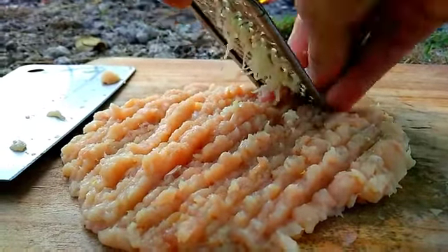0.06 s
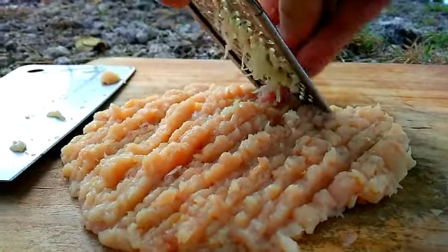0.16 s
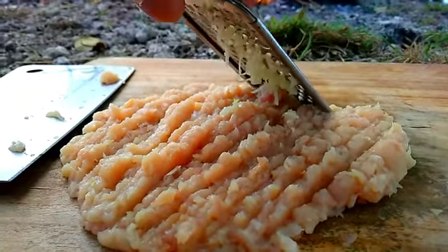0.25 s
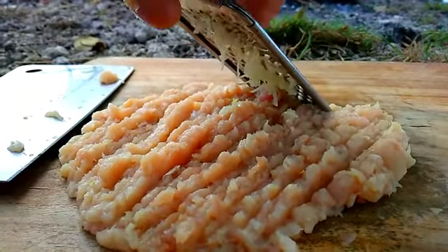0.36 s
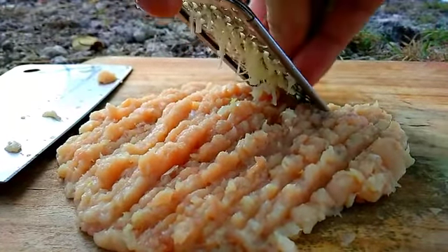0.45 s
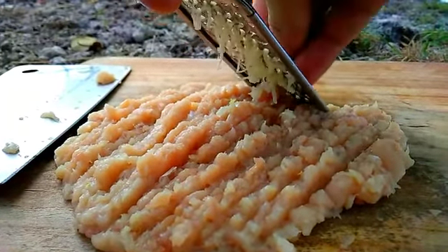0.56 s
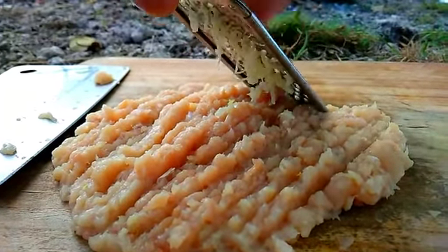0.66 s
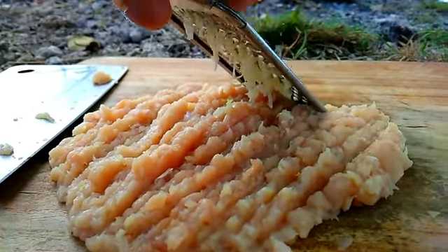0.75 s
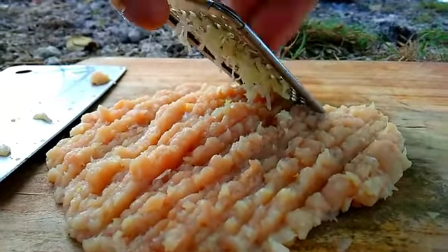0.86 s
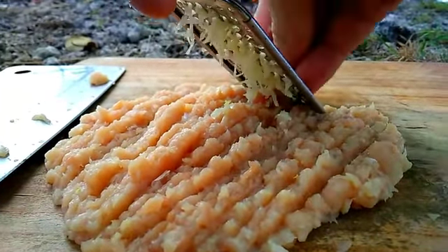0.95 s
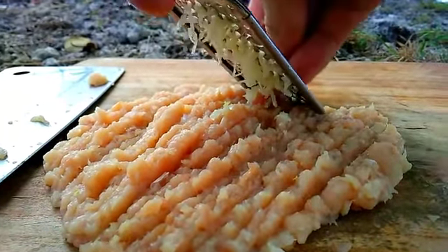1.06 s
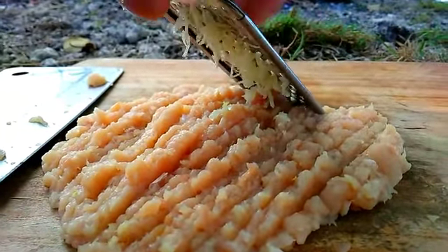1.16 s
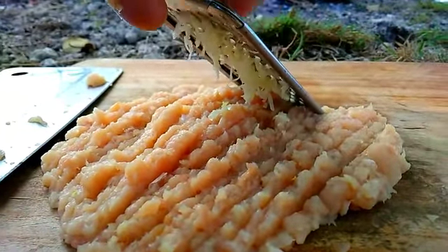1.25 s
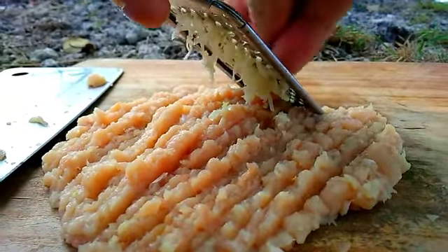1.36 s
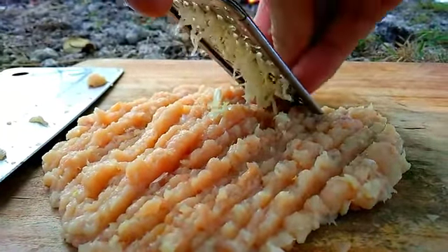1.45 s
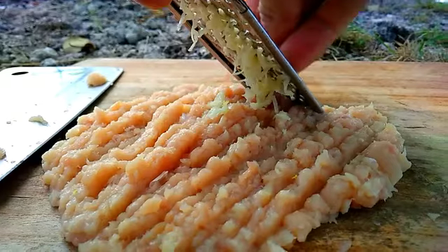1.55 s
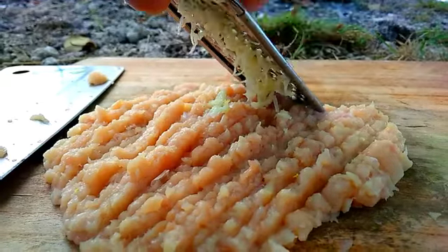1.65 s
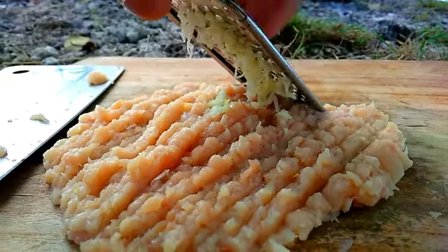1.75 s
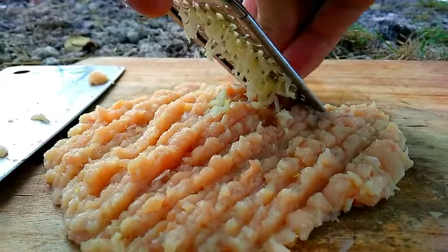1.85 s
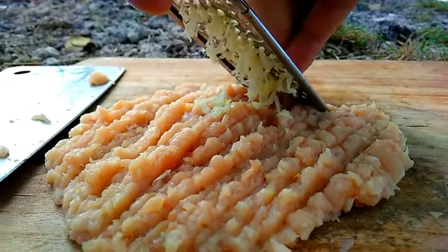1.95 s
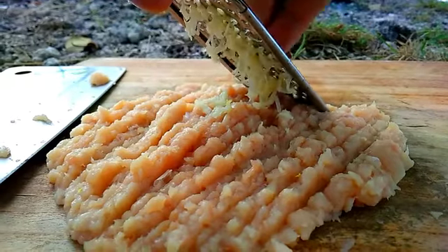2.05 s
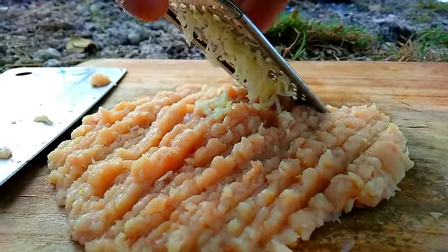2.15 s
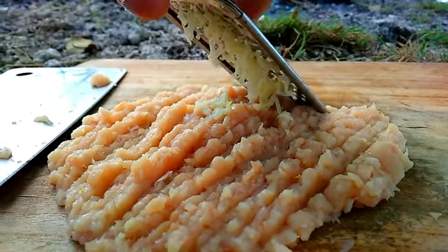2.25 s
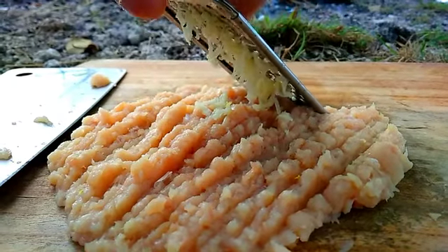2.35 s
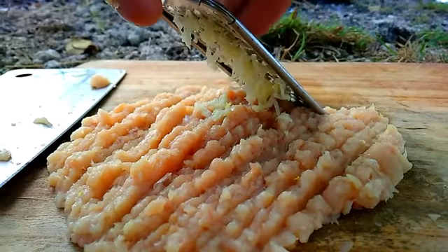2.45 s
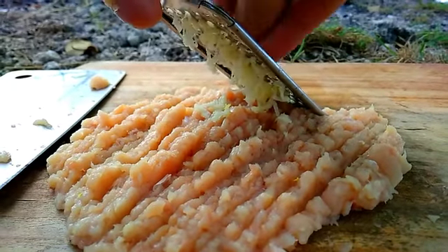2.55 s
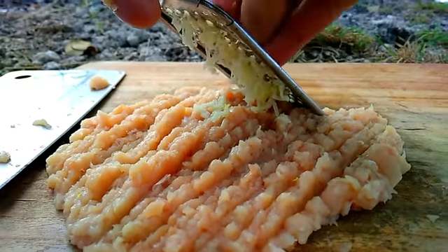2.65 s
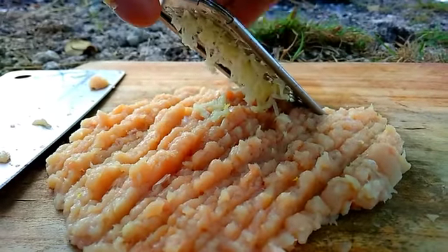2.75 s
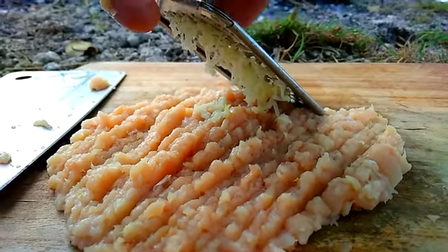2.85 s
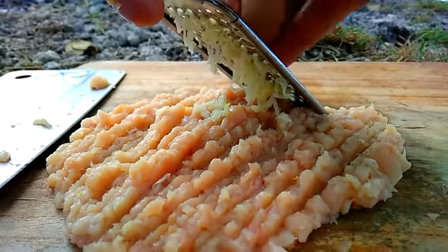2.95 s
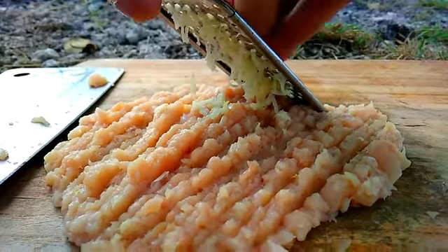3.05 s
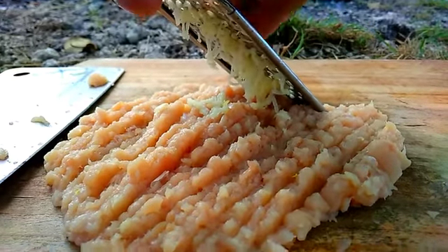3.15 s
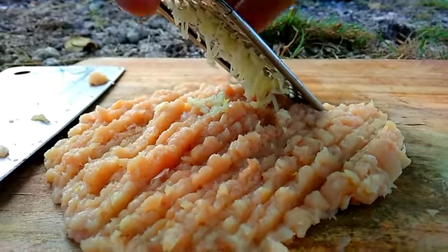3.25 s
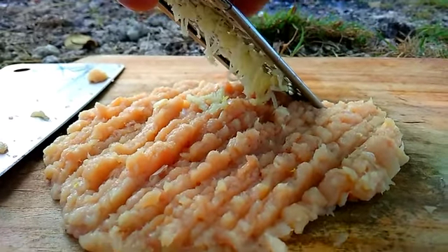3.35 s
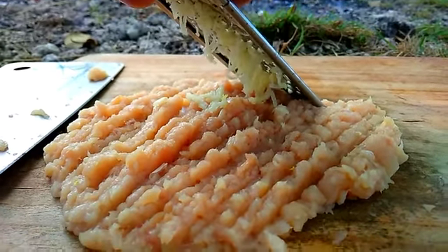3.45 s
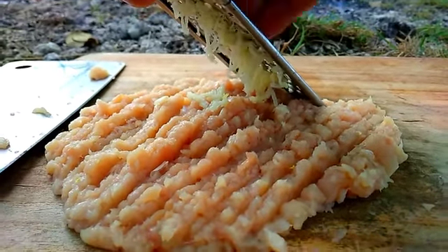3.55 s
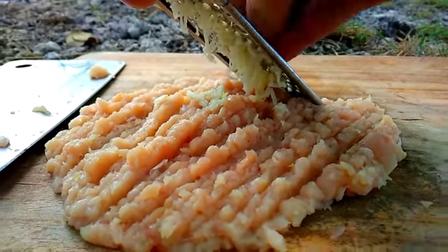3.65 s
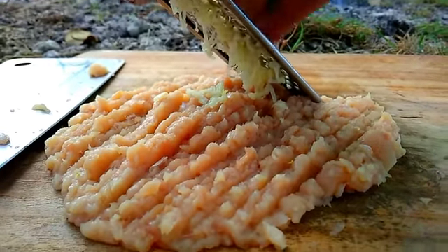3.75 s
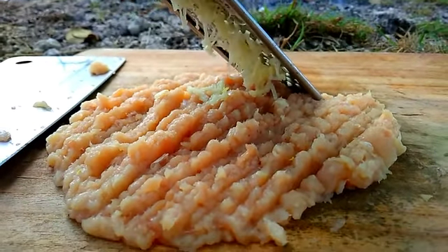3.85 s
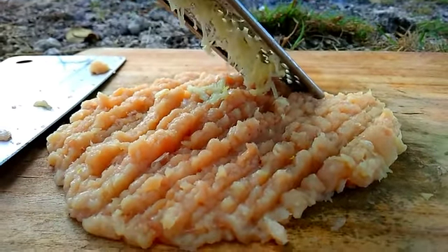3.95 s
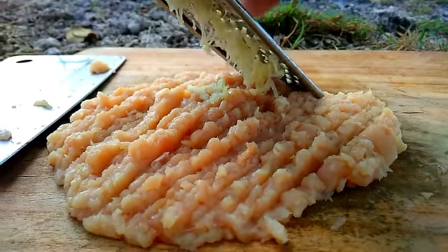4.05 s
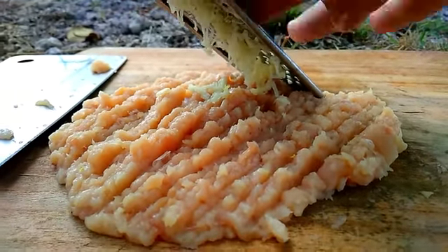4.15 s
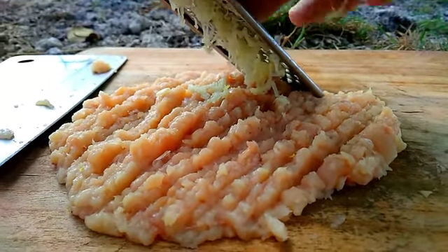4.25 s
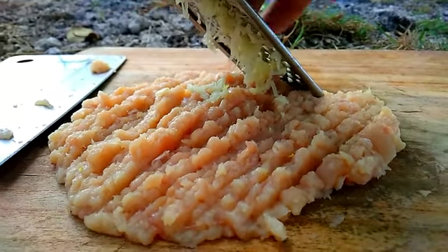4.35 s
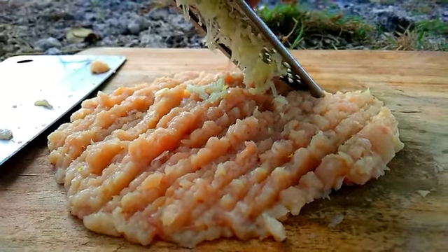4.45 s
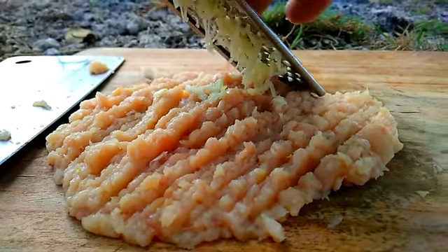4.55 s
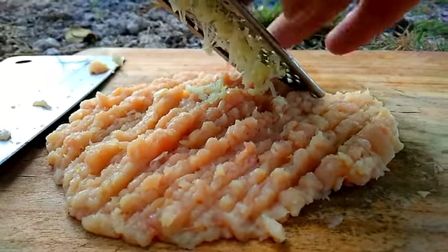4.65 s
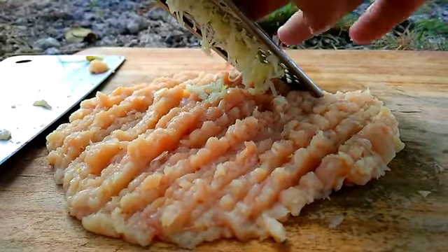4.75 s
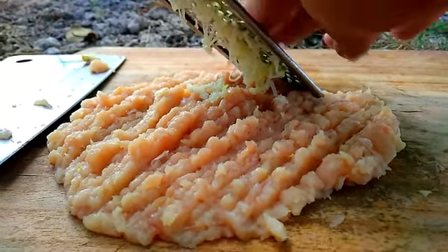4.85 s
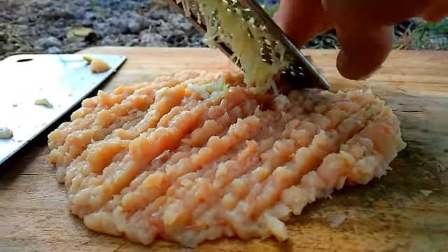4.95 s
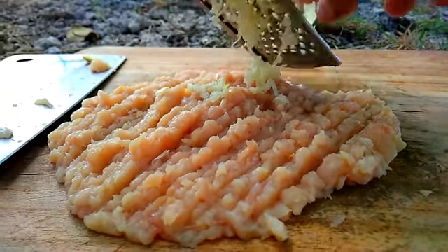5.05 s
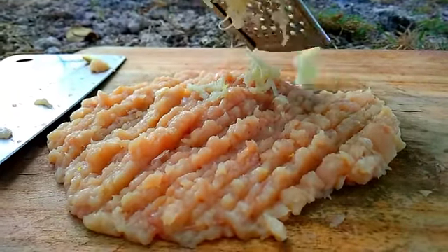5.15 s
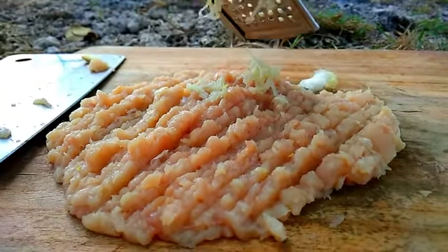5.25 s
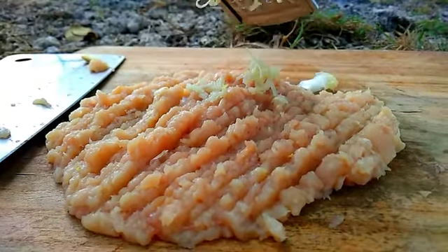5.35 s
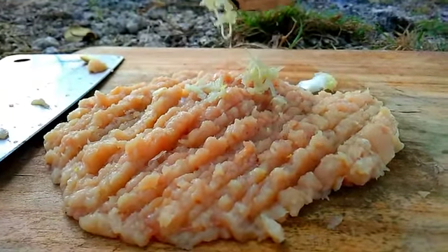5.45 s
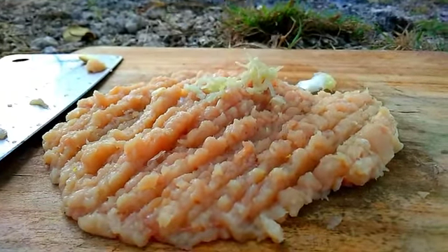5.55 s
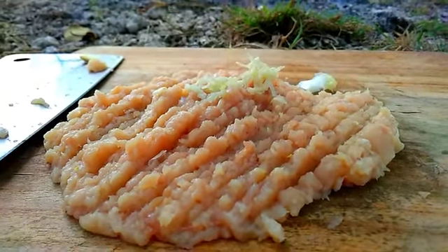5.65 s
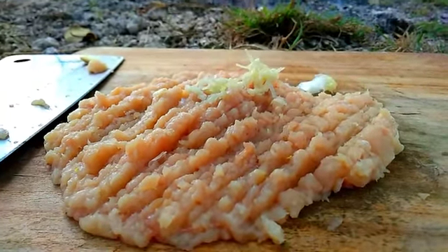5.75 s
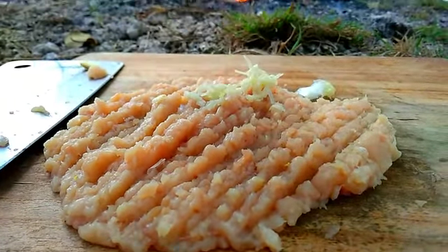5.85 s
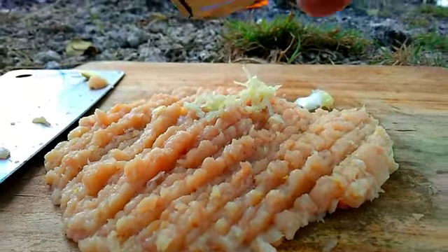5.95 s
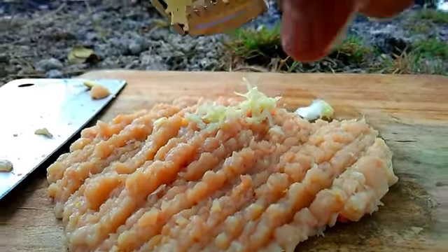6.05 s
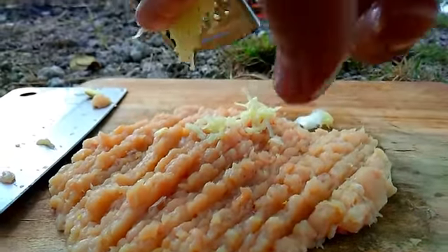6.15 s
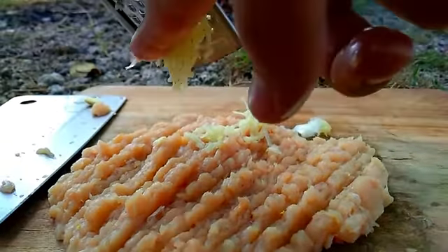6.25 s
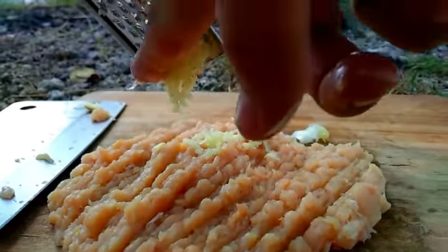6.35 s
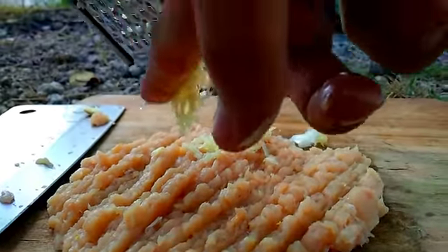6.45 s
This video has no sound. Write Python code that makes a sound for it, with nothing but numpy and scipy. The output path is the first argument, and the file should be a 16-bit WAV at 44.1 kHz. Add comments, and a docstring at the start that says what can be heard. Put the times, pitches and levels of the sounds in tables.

```python
"""Grating ginger outdoors

A ginger root is rubbed over a small steel grater standing on a chopping board, heard close up.
Each cut tears fibres (a bright crackle) and plucks the teeth (a hollow rasp in the plate); the way
back is a light scrape. Wet pulp ticks, and tough fibres catch with a knock and a crack.
Puffs of wind buffet the two microphone ports, over a bed of soft air and a faint low hum."""
import sys
import numpy as np
from scipy import signal
from scipy.fft import rfft, irfft, next_fast_len
from scipy.io import wavfile
from scipy.ndimage import uniform_filter1d, map_coordinates

SR = 44100
rng = np.random.default_rng(int(sys.argv[2]) if len(sys.argv) > 2 else 0)


def int16_out(signal):
    """Quantize to a 16-bit WAV file."""
    q = np.round(np.clip(np.atleast_2d(signal).T, -1, 1) * 32767)
    wavfile.write(sys.argv[1], SR, q.astype(np.int16))


N = 287519
TIME = np.arange(N) / SR

# Levels in the tables are relative; each layer has its own fader.
# cuts down the grater: start_s, length_s, fastest_at_fraction, teeth_db, fibre_db
CUT_STROKES = [(-0.081, 0.19, 0.72, -24, -26), (0.414, 0.175, 0.46, -27.0, -28),
               (0.853, 0.215, 0.64, -28, -29), (1.344, 0.192, 0.46, -27.5, -28.0),
               (1.816, 0.17, 0.45, -28.5, -29), (2.53, 0.183, 0.8, -38, -41.5),
               (2.937, 0.14, 0.25, -34.5, -37), (3.576, 0.152, 0.65, -39, -43),
               (4.202, 0.07, 0.15, -39, -43.5), (4.856, 0.17, 0.38, -37.5, -46)]
# light strokes, back up or to reseat the root: start_s, length_s, fastest_at_fraction, teeth_db, rub_db
BACK_STROKES = [(0.195, 0.16, 0.63, -48.5, -36.5), (0.646, 0.144, 0.44, -48.5, -40.0),
                (1.137, 0.15, 0.79, -51.5, -41), (1.629, 0.12, 0.19, -49.5, -41),
                (1.988, 0.13, 1, -72.5, -55.5), (2.07, 0.21, 0.47, -57.5, -62.5),
                (2.487, 0.051, 0.65, -71.5, -62), (2.779, 0.12, 0.32, -52.5, -48),
                (3.124, 0.091, 0.79, -57, -54.5), (3.2, 0.097, 0.72, -62.5, -73.5),
                (3.488, 0.028, 0.2, -70, -64.5), (3.733, 0.086, 1, -64.5, -61.5),
                (3.826, 0.14, 0.5, -51.5, -58.5), (4.041, 0.1, 0.25, -62, -57),
                (4.162, 0.024, 0.24, -46.5, -47), (4.599, 0.011, 0.47, -74, -54),
                (4.691, 0.15, 0.15, -53, -55)]
# wet pulp snapping, and from 5.8 s, after the grating stops, faint rustles of handling: start_s, level_db,
# pitch_hz, t60_s
PULP_TICKS = [(0.359, -26, 10000, 0.02), (0.702, -24.5, 10600, .012), (1.3339, -28.5, 9400, 0.026),
              (1.647, -26, 9800, 0.017), (1.941, -28, 10200, 0.011), (2.031, -18, 10300, 0.0076),
              (2.3745, -58, 11750, .04), (2.525, -43, 2320, 0.018), (2.544, -25, 11200, .015),
              (2.825, -28.5, 11000, 0.0091), (2.9278, -29, 12000, 0.022), (3.218, -35, 12200, .012),
              (3.5733, -33, 11100, 0.012), (3.7973, -36.5, 11700, 0.017), (4.045, -39.5, 2950, 0.013),
              (4.127, -35, 10100, 0.018), (4.1604, -26.5, 9800, 0.019), (4.187, -27.5, 9400, 0.013),
              (4.208, -22.5, 9700, 0.033), (4.9184, -20, 15000, .012), (5.0455, -39, 11300, .015),
              (5.8186, -62.5, 5560, .03), (5.952, -55, 11160, 0.018), (6.501, -53.5, 13150, .02)]
# tough fibres catching on a tooth and letting go: start_s, knock_db, crack_db
FIBRE_CATCHES = [(0.496, -18, -31), (0.517, -21, -31), (0.55, -25, -24), (0.991, -17.5, -31),
                 (1.911, -16, -30), (1.965, -33, -33), (2.137, -41, -58), (2.246, -38, -69),
                 (2.56, -19, -25.5), (2.597, -27.5, -42.5), (2.635, -26, -33.5), (2.951, -19, -46.5),
                 (3.028, -17.5, -35.5), (3.59, -30.5, -62), (3.62, -26, -40), (3.651, -24, -53),
                 (3.69, -17.5, -34.5), (3.716, -24.5, -47), (3.985, -44, -53), (4.207, -26, -44),
                 (4.642, -47.5, -76), (4.723, -39.5, -67), (4.761, -48, -68), (4.82, -45, -75),
                 (4.87, -26, -59)]
# wind on the ports: middle_s, length_s, level_db, left_minus_right_db
WIND_PUFFS = [(.62, 0.038, -44.5, -5), (1.378, 0.026, -30.5, 18), (1.518, .05, -32.5, -21),
              (1.966, 0.033, -43, -6), (2.648, 0.053, -38.5, -6), (2.991, 0.11, -29, -16),
              (3.105, 0.032, -23, -30), (3.194, 0.12, -35, 1.5), (3.381, 0.25, -27.5, -17),
              (3.417, 0.033, -29.5, 9.5), (3.561, .1, -29.5, 11), (3.678, 0.17, -36.5, 1.5),
              (3.863, 0.031, -32, -9), (4.062, 0.26, -38.5, -10), (5.669, 0.086, -29.5, 27),
              (5.937, 0.15, -41, 12)]
# bending modes of the plate, damped by hand and pulp: pitch_hz, width_hz, level_db
PLATE_MODES = [(437, 77, -22), (589.2, 91, -3), (645.2, 119, 4.5), (710.5, 120, -2), (959.8, 94, -1),
               (1010.7, 83, -7), (1460, 13, -35), (1743, 100, -18.5), (1953, 131, -19), (2270, 210, -18.5),
               (2860, 320, -33)]
# grip and root load the plate, making its ring darker or brighter: time_s, tilt_db_per_octave
GRIP_TILT = [(.05, -8), (.5, -1), (1, 5), (1.45, -3), (1.9, -1.5), (2.65, 5), (3, -1), (3.65, 1), (4.2, 1),
             (4.95, 4)]
# tone colour of each texture: frequency_hz, level_db
TEAR_EQ = [(400, -44.5), (1300, -18), (2600, -9), (3300, -17.5), (3850, -19), (4300, -15.5), (7000, -13),
           (8500, -7.5), (10600, 0), (12500, -6), (14000, -9.5), (15500, -9)]  # fibres tearing
RUB_EQ = [(400, -42), (1300, -13.5), (1900, -10.5), (2500, -8.5), (3400, -13.5), (4600, -15.5),
          (6000, -4.5), (8200, -4), (10500, 5.5), (12500, 0), (15500, -5)]  # wet root sliding
CRACK_EQ = [(400, -32), (1300, -6), (2280, -1), (3540, -16.5), (5620, -8.5), (7330, -12), (9370, -5),
            (15000, -6.5)]  # a tough fibre breaking
WIND_EQ = [(12, -37.5), (20, 5), (78, 2), (114, -10), (156, -14), (327, -36.5), (400, -39), (520, -63),
           (880, -120)]  # rumble on the ports
AIR_EQ = [(20, -7.5), (90, -10.5), (185, -12), (300, -28.5), (430, -31.5), (700, -38.5), (1500, -52),
          (3000, -54), (8500, -57), (10600, -47), (12500, -53), (14000, -68)]  # open air, with microphone hiss on top
# how alike the air is in left and right: frequency_hz, correlation
AIR_CORRELATION = [(60, 0.92), (240, 0.39), (950, 0.033), (3770, 0.00036), (15000, 0.18)]


def amp(db):
    """Decibels to gain."""
    return 10 ** (np.asarray(db) / 20)


def unit(x):
    """Scaled to rms 1."""
    return x / np.sqrt(np.mean(abs(x) ** 2) + 1e-20)


def curve_at(points, hz):
    """Read a curve of (frequency_hz, value) points on a log frequency axis."""
    frequencies, values = np.transpose(points)
    return np.interp(np.log(hz + 1), np.log(frequencies + 1), values)


def wobble(rate_hz):
    """A smooth random modulator with rate_hz knots a second."""
    return map_coordinates(rng.standard_normal(int(N * rate_hz / SR) + 4), [TIME * rate_hz])


def filtered(x, response):
    """Filter x by a response given as a function of frequency."""
    size = next_fast_len(N + SR // 2)
    return irfft(rfft(x, size) * response(np.fft.rfftfreq(size, 1 / SR)), size)[..., :N]


def noise(eq):
    """Two unrelated coloured noises of rms 1."""
    return unit(filtered(rng.standard_normal((2, N)), lambda hz: amp(curve_at(eq, hz))))


def resonance(hz, centre, width):
    """Response of one damped mode."""
    return 1j * hz * width / (centre ** 2 - hz ** 2 + 1j * hz * width)


def snaps(per_s, spread_db):
    """Crackle: tiny impulses of uneven size at random moments, rms 1."""
    size = amp(spread_db * np.clip(rng.standard_normal(N), -2, 2))
    return unit((rng.random(N) < per_s / SR) * rng.choice([-1, 1], N) * size)


def burst(t, rise_s, t60_s):
    """Envelope of a small snap: a quick attack, then a decay."""
    return (1 - np.exp(-t / rise_s)) * amp(-60 * t / t60_s)


def stroke(start, length, fastest_at, swell_db, attack_s, release_db_per_s):
    """Envelope of one stroke: the hand's speed is a half sine, and the level swells with it."""
    t = TIME - start
    peak_s = length * np.clip(fastest_at, .05, .95)
    speed = np.sin(np.interp(t, [0, peak_s, length], [0, np.pi / 2, np.pi]))
    contact = np.exp(np.minimum(t, 0) / attack_s)
    return contact * amp(swell_db * (speed - 1) - release_db_per_s * np.maximum(t - length, 0))


def plate_ring(force, tilt_db, pivot_hz=700, drift_db=2, left_right_db=(-2, -8.5)):
    """The hollow body: the plate's bending modes ring, each rising and falling as the contact wanders."""
    size = next_fast_len(N + SR // 2)
    hz = np.fft.rfftfreq(size, 1 / SR)
    modes = [amp(db) * resonance(hz, centre, width) ** 2 for centre, width, db in PLATE_MODES]
    drive = rfft(force, size) / np.sqrt(np.mean(abs(sum(modes)) ** 2))
    octaves = np.minimum(np.log2(np.array(PLATE_MODES)[:, 0] / pivot_hz), .5)  # tilt flattens up high
    ring = sum(irfft(drive * mode, size)[:N] * amp(tilt_db * octave + drift_db * wobble(22))
               for mode, octave in zip(modes, octaves))
    return ring * amp(left_right_db)[:, None]


def steel_sheen(force, eq, t60_s=0.055, ring_db=-4):
    """The bright top: a stereo force heard directly and through the dense high modes of the steel."""
    t = TIME[:SR // 5]
    tail = rng.standard_normal((2, len(t))) * amp(-60 * t / t60_s)
    tail /= np.linalg.norm(tail, axis=1, keepdims=True)
    ring = signal.fftconvolve(force, tail, axes=1)[:, :N]
    return filtered(force + amp(ring_db) * ring, lambda hz: unit(amp(curve_at(eq, hz))))


def root_damping(x, mid_db=11, edge_db=3.5):
    """The moving root damps now these modes, now those: the colour shifts, most where they are sparse."""
    hz, _, frames = signal.stft(x, SR, nperseg=1024)
    drift = uniform_filter1d(rng.standard_normal(frames.shape[1:]), size=3, axis=0)
    drift = unit(uniform_filter1d(drift, size=8, axis=1))
    depth_db = curve_at([(1500, edge_db), (3500, mid_db), (7000, mid_db), (9500, edge_db)], hz)
    gain = amp(depth_db[:, None] * np.minimum(drift, 1.2))
    gain /= np.sqrt(np.mean(gain ** 2, axis=1, keepdims=True))
    return signal.istft(frames * gain, SR, nperseg=1024)[1][:, :N]


def cutting_strokes(bite_s=.0055, cling_db=-41):
    """The root judders over the teeth, plucking the plate and tearing many fine fibres, a few coarse."""
    pluck, tear = np.zeros((2, N))
    for *motion, teeth_db, fibre_db in CUT_STROKES:
        pluck += amp(teeth_db) * stroke(*motion, swell_db=12, attack_s=bite_s, release_db_per_s=758)
        rip = amp(fibre_db) * stroke(*motion, swell_db=8.5, attack_s=bite_s, release_db_per_s=660)
        # wet pulp clings and tears on, giving each cut a quiet tail
        cling = stroke(*motion, swell_db=0, attack_s=bite_s, release_db_per_s=145.5)
        tear += np.hypot(rip, amp(cling_db + fibre_db / 2) * cling)
    judder_db = 1.1 * wobble(120)
    teeth = unit(snaps(per_s=1300, spread_db=2) * amp(judder_db)) * pluck
    fine = np.array([snaps(per_s=9000, spread_db=7) for port in range(2)])
    coarse = amp(-8.5) * snaps(per_s=260, spread_db=5)
    fibres = unit((fine + coarse) * amp(judder_db + 1.1 * wobble(45))) * tear
    rasp = plate_ring(teeth, tilt_db=np.interp(TIME, *np.transpose(GRIP_TILT)))
    crackle = root_damping(steel_sheen(fibres, TEAR_EQ))
    return amp(3.5) * rasp + amp(2) * crackle


def outdoor_bed(air_left_right_db=(-53, -55.3), hum_left_right_db=(-53.5, -57.5), hum_hz=87.2):
    """Low restless air with a faint hiss, and a wavering hum like a far engine."""
    def width_angle(hz):
        return np.arccos(curve_at(AIR_CORRELATION, hz)) / 2

    mid, side = noise(AIR_EQ)
    mid = filtered(mid, lambda hz: np.cos(width_angle(hz)))
    side = filtered(side, lambda hz: np.sin(width_angle(hz)))
    air = amp(2.1 * wobble(11)) * np.array([mid + side, mid - side])
    hum_swell = amp(0.73 * wobble(25))
    hum_phase = 2 * np.pi * np.cumsum(hum_hz + 2 * wobble(8.9)) / SR
    hum = np.sqrt(2) * hum_swell * np.sin(hum_phase)
    return air * amp(air_left_right_db)[:, None] + hum * amp(hum_left_right_db)[:, None]


def back_strokes():
    """The wet root slides over the blunt side of the teeth, too lightly to drive much low ring."""
    touch, slide = np.zeros((2, N))
    settle_and_lift = dict(attack_s=0.0089, release_db_per_s=597.5)
    for *motion, teeth_db, rub_db in BACK_STROKES:
        touch += amp(teeth_db) * stroke(*motion, swell_db=11, **settle_and_lift)
        slide += amp(rub_db) * stroke(*motion, swell_db=8, **settle_and_lift)
    judder = wobble(90)
    teeth = unit(snaps(per_s=980, spread_db=5.5) * amp(2 * judder)) * touch
    grain = np.array([snaps(per_s=5600, spread_db=7.5) for port in range(2)])
    rub = unit(grain * amp(1.1 * judder)) * slide
    rasp = plate_ring(teeth, tilt_db=13)
    scrape = root_damping(steel_sheen(rub, RUB_EQ))
    return amp(0.95) * rasp + amp(1) * scrape


def pulp_ticks(rise_share=.05, width_share=0.6):
    """Small wet films of pulp snap, each at its own pitch; the longer ones have a softer attack. The last few,
    after the grating, are faint rustles as the grater is handled."""
    ticks, t = np.zeros((2, N + SR)), TIME[:SR // 20]
    hz = np.fft.rfftfreq(len(t), 1 / SR)
    for start_s, level_db, pitch_hz, t60_s in PULP_TICKS:
        start = round(start_s * SR)
        colour = resonance(hz, pitch_hz, width_share * pitch_hz) ** 2
        fizz = unit(irfft(rfft(rng.standard_normal((2, len(t)))) * colour, len(t)))
        ticks[:, start:start + len(t)] += amp(level_db) * burst(t, rise_share * t60_s, t60_s) * fizz
    return amp(-1) * ticks[:, :N]


def fibre_catches(neutral_knock_db=-29, tilt_per_db=.7):
    """A caught fibre cracks and the plate springs back; the lighter the knock, the brighter it rings."""
    knocks, cracks, t = np.zeros(N), np.zeros((2, N + SR)), TIME[:SR // 20]
    envelope = burst(t, rise_s=0.0007, t60_s=0.018)
    for start_s, knock_db, crack_db in FIBRE_CATCHES:
        start = round(start_s * SR)
        knocks[start] = amp(knock_db)
        cracks[:, start:start + len(t)] += amp(crack_db) * envelope * rng.standard_normal((2, len(t)))
    times, strength_db, _ = np.transpose(FIBRE_CATCHES)
    tilt_db = tilt_per_db * (neutral_knock_db - np.interp(TIME, times, strength_db))
    return amp(19.5) * plate_ring(knocks, tilt_db) + amp(5.5) * steel_sheen(cracks[:, :N], CRACK_EQ)


def wind_puffs(edge_drop_db=6, small_eddy_s=0.063, small_pitch_ratio=1.4):
    """Puffs swell and fade, buffeting each port separately; short ones are small eddies and sit higher."""
    large_power, small_power = np.zeros((2, 2, N))
    for middle_s, length_s, level_db, pan_db in WIND_PUFFS:
        pan = amp([[pan_db], [0]]) / np.hypot(amp(pan_db), 1)
        swell = amp(level_db - edge_drop_db * (2 * (TIME - middle_s) / length_s) ** 2)
        power = (pan * swell) ** 2
        small_share = np.exp(-(length_s / small_eddy_s) ** 2)
        large_power += (1 - small_share) * power
        small_power += small_share * power
    small_eq = [(small_pitch_ratio * hz, db) for hz, db in WIND_EQ]
    return amp(5.5) * (np.sqrt(large_power) * noise(WIND_EQ) + np.sqrt(small_power) * noise(small_eq))


def scene():
    """The mix: the grater up front, wind and open air around it."""
    grater = cutting_strokes() + back_strokes() + fibre_catches() + pulp_ticks()
    return grater + wind_puffs() + outdoor_bed()


def record(dry, cutoff_hz=15550):
    """A brick-wall low-pass trims the very top."""
    return filtered(dry, lambda hz: 1 / np.sqrt(1 + (hz / cutoff_hz) ** 240))


dry = scene()
out = record(dry)
int16_out(out)
```